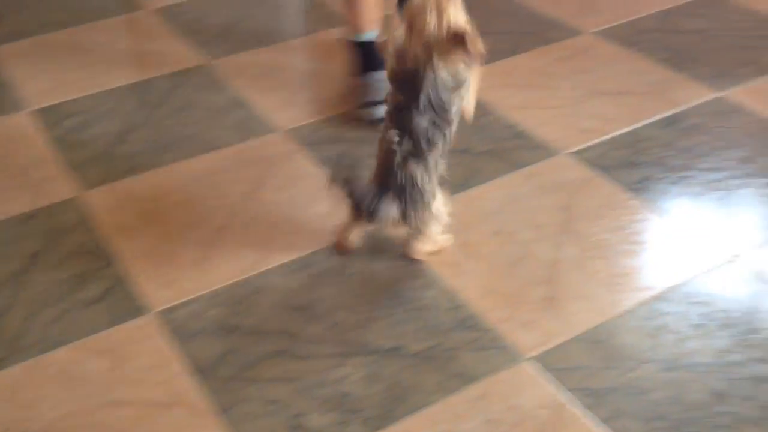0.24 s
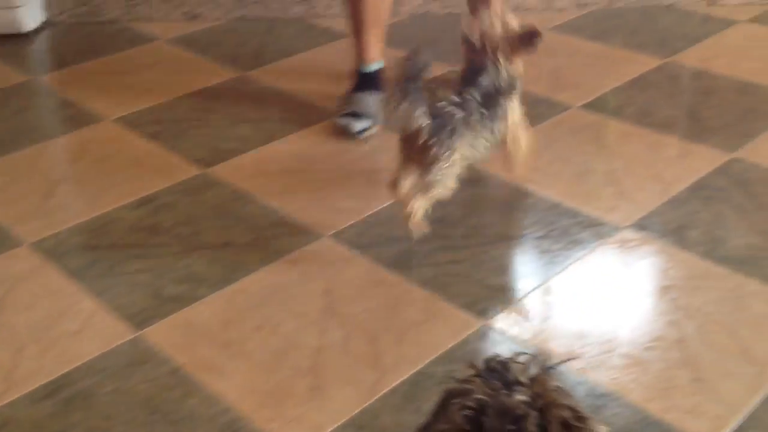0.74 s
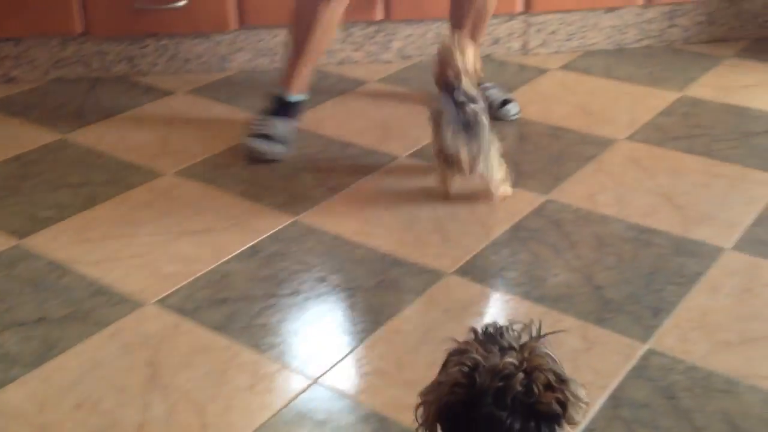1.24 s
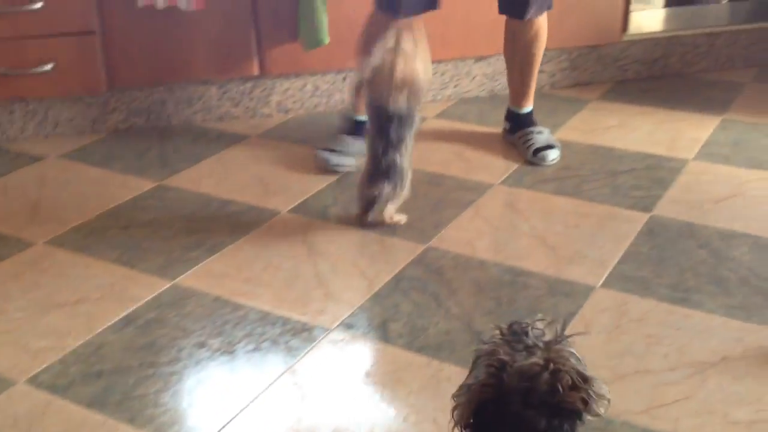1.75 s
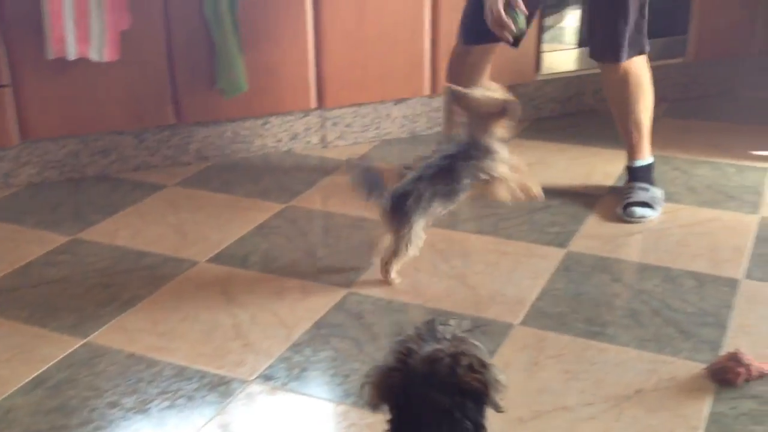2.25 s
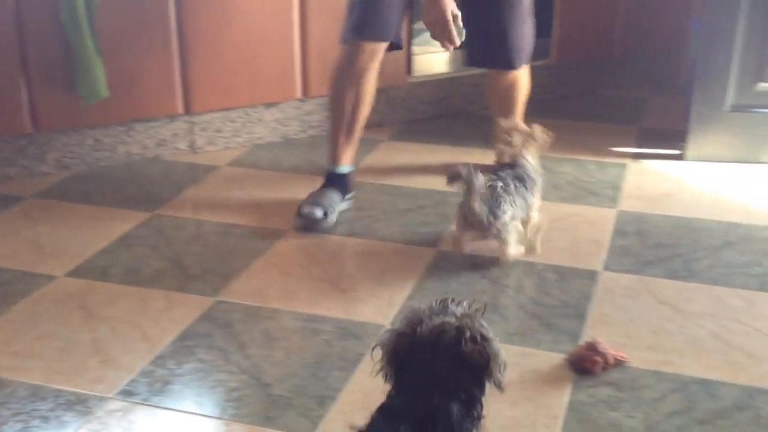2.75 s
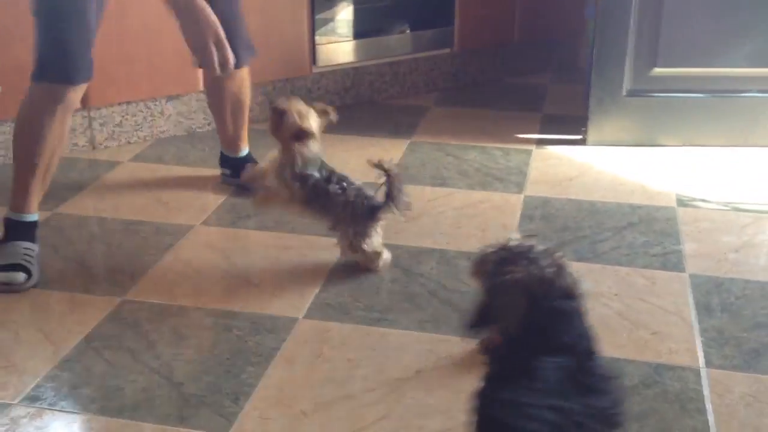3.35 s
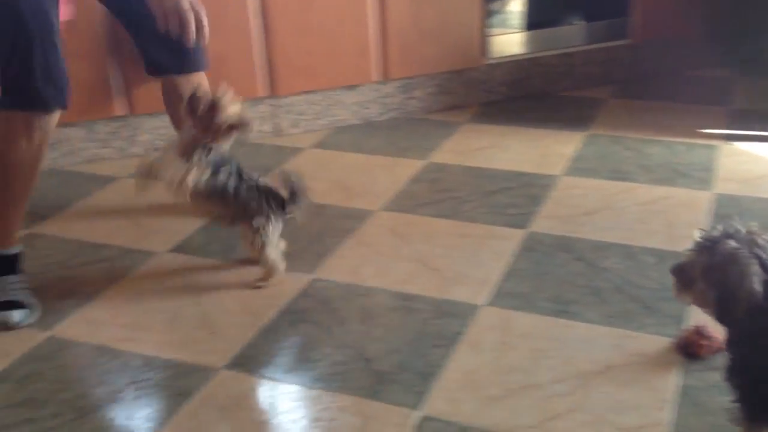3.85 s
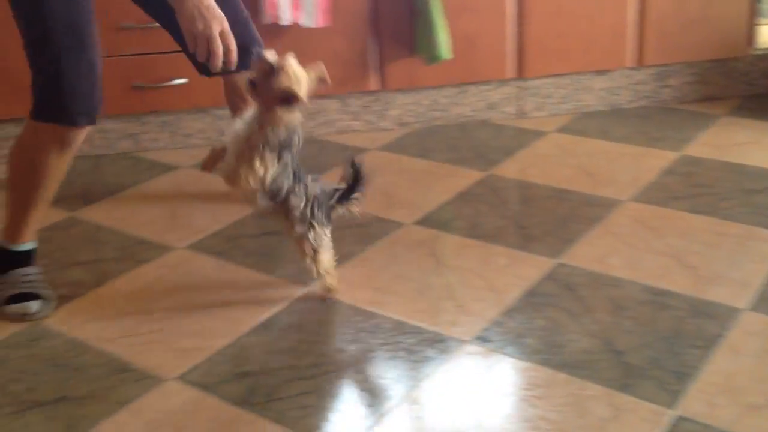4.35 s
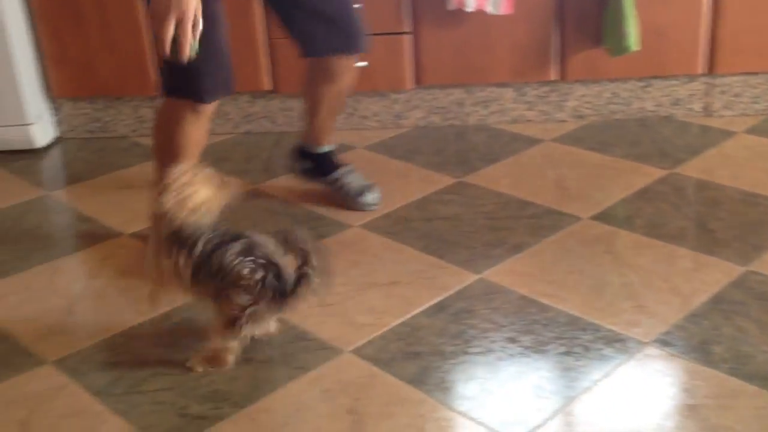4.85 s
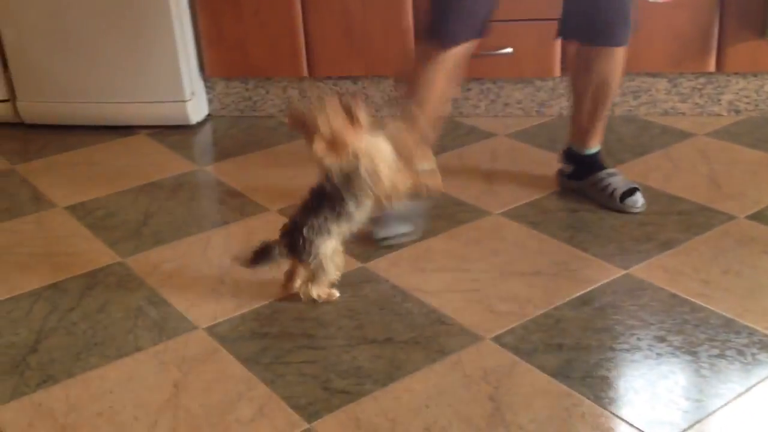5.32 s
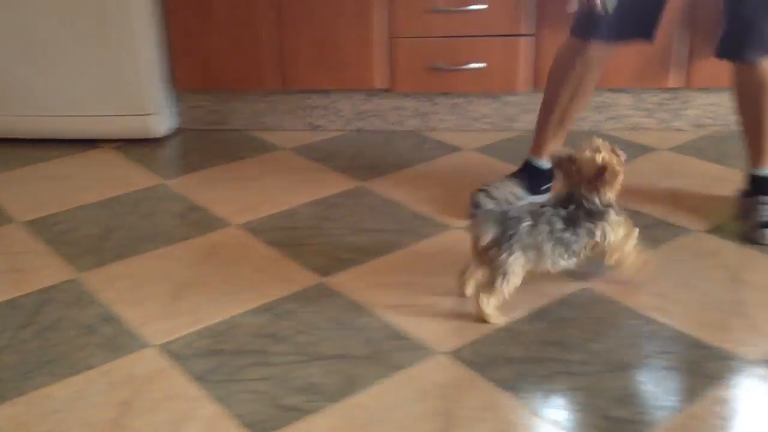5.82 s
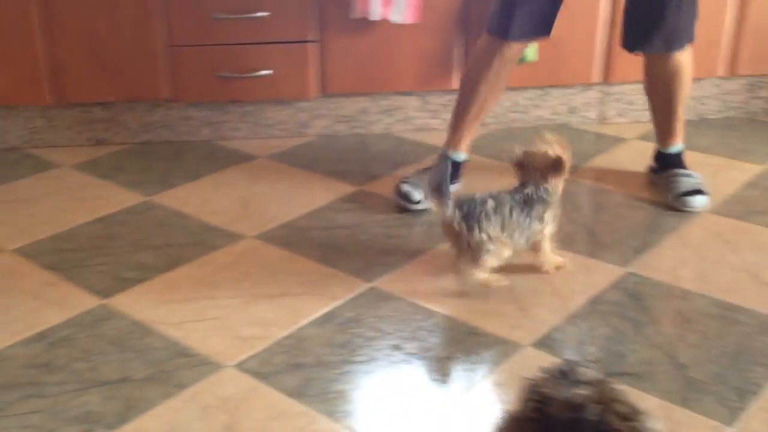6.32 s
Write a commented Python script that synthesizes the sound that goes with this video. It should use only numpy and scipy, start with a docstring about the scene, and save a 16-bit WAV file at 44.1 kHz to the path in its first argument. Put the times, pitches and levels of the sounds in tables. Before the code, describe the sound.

A small dog yaps three times in an echoing tiled kitchen, with faint panting and soft thumps of paws and feet between.

```python
"""A tiled kitchen, one mono microphone in the room with a small dog that jumps about and yaps three times.
Each yap is a rising voice shaped by throat and mouth, and the hard room rings after it. Between yaps
the dog pants, bodies shuffle, claws tick, paws and feet thump the floor and something squeaks faintly.
At this distance the room's ring on yaps and footfalls is about as strong as the direct sound."""
import sys
import numpy as np
from scipy import signal
from scipy.fft import rfft, irfft, next_fast_len
from scipy.io import wavfile
from scipy.ndimage import uniform_filter1d, minimum_filter1d, map_coordinates

SR = 44100
rng = np.random.default_rng(int(sys.argv[2]) if len(sys.argv) > 2 else 0)


def store_pcm(level_fs):
    """Save levels as 16-bit WAV."""
    pcm = np.round(np.clip(level_fs, -1, 1) * 32767).astype(np.int16)
    wavfile.write(sys.argv[1], SR, np.atleast_2d(pcm).T)


N = 290061


def amp(db):
    """Gain of a level in dB."""
    return 10 ** (np.asarray(db) / 20)


def unit(x):
    """x at rms 1."""
    return x / np.sqrt(np.mean(x ** 2) + 1e-20)


def along(points, hz):
    """(f/Hz, value) points read on a log frequency axis."""
    f, v = np.transpose(points)
    return np.interp(np.log(hz + 1), np.log(f + 1), v)


def curves(rows, t):
    """Each column after the time, read at times t."""
    times, *columns = np.transpose(rows)
    return [np.interp(t, times, column) for column in columns]


def wobble(rate, size=N):
    """A smooth random curve, rate knots a second."""
    knots = rng.standard_normal(int(size * rate / SR) + 4)
    return map_coordinates(knots, [np.arange(size) * rate / SR])


def filtered(x, response):
    """x times a response of frequency."""
    m = next_fast_len(len(x) + SR // 4)
    return irfft(rfft(x, m) * response(np.fft.rfftfreq(m, 1 / SR)), m)[:len(x)]


def coloured(x, spectrum):
    """x shaped by (f/Hz, level/dB) points, at rms 1."""
    return unit(filtered(x, lambda hz: amp(along(spectrum, hz))))


def rush(spectrum, patchy_db):
    """Coloured noise of rms 1 with patches of random gain in time and frequency."""
    z = signal.stft(rng.standard_normal(N + 512), nperseg=512)[2]
    patches = uniform_filter1d(uniform_filter1d(rng.standard_normal(z.shape), 6, 0), 8, 1)
    noise = signal.istft(z * amp(patchy_db * unit(patches)), nperseg=512)[1][:N]
    return coloured(noise, spectrum)


def add(track, start, x):
    """Mixes x into the track from start, in seconds."""
    part = track[round(start * SR):][:len(x)]
    part += x[:len(part)]


# Breaths: full from t/s, swell/s, hold/s, breath level/dB, hiss level/dB
BREATHS = [(0.0, .02, 0.089, -52.5, -57), (0.146, 0.077, 0.13, -51, -54.5),
           (0.313, 0.016, 0.048, -47.5, -57), (0.577, 0.11, 0.015, -51, -58.5),
           (0.674, 0.017, 0.026, -45, -58), (0.804, .06, 0.26, -47, -53.5), (1.472, 0.28, 0.19, -49.5, -58),
           (1.945, 0.19, 0.053, -50.5, -56), (2.39, 0.1, 0.12, -47.5, -52.5),
           (3.107, 0.11, 0.24, -47.5, -54.5), (3.58, 0.1, 0.12, -45, -51), (3.798, .04, 0.046, -51, -56.5),
           (4.021, 0.1, 0.13, -45.5, -52), (4.287, 0.066, 0.093, -56.5, -61),
           (4.419, 0.022, 0.025, -48, -61), (4.537, 0.079, 0.16, -51.5, -54), (4.792, .03, 0.14, -59, -61),
           (4.957, 0.036, 0.092, -59.5, -72), (5.375, 0.099, 0.072, -58, -60.5),
           (5.534, 0.076, 0.26, -52.5, -54.5), (5.947, 0.11, 0.12, -50.5, -56.5),
           (6.18, 0.023, 0.037, -53, -58), (6.416, 0.097, .17, -49, -53)]
# Body of a breath: f/Hz, level/dB
BREATH_SPECTRUM = [(290, -38), (500, -27), (568, 1), (645, -11.5), (786, -2.5), (969, -2.5), (1370, 0),
                   (1670, 2), (1900, 4.5), (3200, -6), (4750, -1), (8000, -19), (10400, -37.5),
                   (17600, -120)]
# Its treble edge: f/Hz, level/dB
HISS_SPECTRUM = [(3530, -35), (6000, 2), (6620, 0.5), (9820, -3), (13200, -2), (15300, -6)]


def panting():
    """The dog's breath, dry at the microphone: each swells, holds and fades, its hiss fading faster."""
    full_at, swell, hold, breath_db, hiss_db = np.transpose(BREATHS)[..., None]
    t = np.arange(0, N, 64) / SR
    swell_db = -18.5 * np.maximum(full_at - t, 0) / np.maximum(swell, .005)
    after_hold = np.maximum(t - full_at - hold, 0)

    def airflow(db, fade_db_per_s):
        each_breath = amp(db + swell_db - fade_db_per_s * after_hold)
        return np.interp(np.arange(N) / SR, t, np.linalg.norm(each_breath, axis=0))

    breath = airflow(breath_db, 84.5) * amp(1.1 * wobble(30)) * rush(BREATH_SPECTRUM, patchy_db=0.07)
    hiss = airflow(hiss_db, 102) * amp(.7 * wobble(40)) * rush(HISS_SPECTRUM, patchy_db=2.5)
    return breath + hiss


# Movement about the floor: t/s, level/dB
SHUFFLE_LEVELS = [(0.0, -50.5), (0.38, -64.5), (0.79, -54), (1.1, -58), (1.7, -61.5), (2.16, -56),
                  (2.49, -62), (2.75, -56), (3.0, -60.5), (3.52, -59.5), (5.51, -64.5), (5.7, -55.5),
                  (6.01, -58.5), (6.58, -56.5)]
# Its rumble: f/Hz, level/dB
SHUFFLE_SPECTRUM = [(24, -76.5), (40, -40), (144, -4.5), (168, -5.5), (214, 0.5), (333, -4), (598, -8),
                    (679, -6), (1200, -13), (1560, -34.5), (2640, -120)]


def shuffling():
    """Moving feet and bodies make a low, uneven rumble."""
    db = curves(SHUFFLE_LEVELS, np.arange(N) / SR)[0] + 1.7 * wobble(2.6)
    return amp(db) * rush(SHUFFLE_SPECTRUM, patchy_db=4.0)


# Room tone: f/Hz, level/dB
AIR_SPECTRUM = [(180, -27), (300, -9), (491, -24), (542, -12), (1170, -4.5), (1800, 2), (3050, -12.5),
                (4680, -2.5), (7170, -11), (12800, -15), (15300, -26)]


def room_tone():
    """The kitchen's air, a steady hush at the microphone."""
    return amp(-58.5) * rush(AIR_SPECTRUM, patchy_db=1.5)


# Ring of the hard room: f/Hz, t60/s
KITCHEN_DECAY = [(200, 0.54), (900, 0.73), (1500, 0.8), (3000, 0.8), (6000, 0.66), (12000, 0.37)]


def kitchen(x, wet_db, build_s):
    """Direct sound plus a tail that builds up from the walls and dies at its own speed per frequency."""
    hz, t, z = signal.stft(rng.standard_normal(2 * SR), SR, nperseg=256)
    decay = amp(-60 * t / along(KITCHEN_DECAY, hz)[:, None])
    tail = signal.istft(z * decay, SR, nperseg=256)[1]
    tail *= 1 - np.exp(-(np.arange(len(tail)) / SR / build_s) ** 2)
    wet = amp(wet_db) * signal.fftconvolve(x, tail / np.linalg.norm(tail))
    return wet + np.pad(x, (0, len(wet) - len(x)))


# Claws on tile: t/s, level/dB, f/Hz
CLAW_TICKS = [(0.121, -39, 12700), (0.1456, -26.5, 12350), (0.1558, -22, 8640), (0.589, -38, 7250),
              (2.321, -50, 12400), (2.8376, -49, 7890), (3.921, -43, 7840), (4.238, -40.5, 12560),
              (4.351, -36, 7060), (4.4184, -49, 7920), (4.9197, -47, 7840), (5.2764, -46, 8130),
              (5.3213, -47, 12400), (5.345, -33.5, 12400)]


def claws():
    """A claw striking tile gives a few noisy cycles high up."""
    out, t = np.zeros(N), np.arange(SR // 5) / SR
    t60_s = 0.0012
    for start, db, hz in CLAW_TICKS:
        tick = np.sin(2 * np.pi * hz * t) + .4 * rng.standard_normal(len(t))
        add(out, start, amp(db - 60 * t / t60_s) * tick)
    return out


# Paws and feet landing: t/s, level/dB, floor f/Hz, slap level/dB relative to the ring
LANDINGS = [(0.328, -55, 209, 12), (0.504, -44.5, 208, 1), (0.571, -42.5, 205, 6.5),
            (0.609, -54.5, 302, 14.5), (0.748, -33, 190, -11), (1.528, -44, 249.6, -5.5),
            (2.008, -48, 185, 7), (2.192, -51.5, 388, 7), (2.208, -44, 232, 4), (2.512, -33.5, 198, 1),
            (2.546, -33.5, 278, 4), (2.847, -49, 195.8, 10.5), (3.33, -45, 252, -3.5),
            (3.767, -31.5, 211, -10), (4.266, -41.5, 256, 1.5), (4.8, -40.5, 295, -3),
            (5.157, -45, 246, -7.5), (5.493, -48.5, 188, 3.5), (5.7, -53, 259, 7), (6.219, -40, 276, 2.5),
            (6.244, -36.5, 185, 0.5)]
# A sole or pad meeting tile: f/Hz, level/dB
SLAP_SPECTRUM = [(40, -25), (100, -7), (200, -4), (600, 0.5), (1500, -6.5), (2500, -18), (5000, -42)]


def footfalls():
    """Each landing is a low ring of the floor with a soft slap."""
    out, t = np.zeros(N), np.arange(SR // 5) / SR
    ring_t60_s, slap_t60_s = 0.084, 0.095
    slap_onset = 1 - np.exp(-t / .0015)
    for start, db, hz, slap_db in LANDINGS:
        rise_s = 0.003 * amp(-0.35 * slap_db)  # a soft landing sets the floor going more slowly
        ring = amp(-60 * t / ring_t60_s) * (1 - np.exp(-t / rise_s)) * np.sin(2 * np.pi * hz * t)
        noise = coloured(rng.standard_normal(len(t)), SLAP_SPECTRUM)
        slap = amp(slap_db - 60 * t / slap_t60_s) * slap_onset * noise
        add(out, start, amp(db - 3) * (ring + slap))
    return out


# Throat behind a barely open mouth, as each yap starts: f/Hz, level/dB
NARROW_MOUTH = [(300, -60), (900, -15), (1400, -14), (1950, 0), (2250, -2), (2850, -27), (3550, -21),
                (4100, -14), (4600, -9), (5200, -13), (6100, -40), (8800, -36), (12000, -52), (16000, -60)]
# Air rushing past the teeth once the mouth is open: f/Hz, level/dB
TEETH_RASP = [(4000, -43), (5800, 8), (6800, -7), (8200, -3), (10500, -4), (12700, -3.5), (14500, -16.5),
              (16000, -22.5)]


def yap(contour, throat, rasp_db, fundamental_db):
    """Overtones of a rising pitch, weighted by the throat; hoarseness turns them into pulsing noise."""
    t = np.arange(contour[0][0], contour[-1][0], 1 / SR)
    hz, db, rough = curves(contour, t)
    opening = np.clip((hz - 1040) / 200, 0, 1)  # the mouth opens as the pitch jumps up
    rough = np.clip(rough, 0, 1) * (.25 + .75 * opening)
    jitter = (0.004 + 0.1 * rough) * wobble(394.5, size=len(t))
    phase = 2 * np.pi * np.cumsum(hz * (1 + jitter)) / SR
    k = np.arange(1, 13)[:, None]
    treble_octaves = lambda f: np.log2(np.maximum(f / 2200, 1))
    soft_db = 0.81 * (db - db.max()) * treble_octaves(k * hz)  # a soft voice closes gently: less treble
    mouth_db = (1 - opening) * along(NARROW_MOUTH, k * hz) + opening * along(throat, k * hz)
    gains = amp(mouth_db + fundamental_db * (k == 1) + soft_db)
    tone = np.sqrt(2) * (gains * np.sin(k * phase)).sum(0) / np.linalg.norm(gains, axis=0)
    puffs = rng.standard_normal(len(t)) * (1 + 0.75 * np.cos(phase))  # one puff of breath a cycle
    hiss = unit(filtered(puffs, lambda f: amp(along(throat, f) + 3.1 * treble_octaves(f))))
    rasp = amp(rasp_db) * opening * coloured(puffs, TEETH_RASP)
    return amp(db) * (np.sqrt(1 - rough) * tone + np.sqrt(rough) * hiss + rasp)


# The voice, one list per yap: t/s, pitch f/Hz, level/dB, roughness/0-1
YAP_CONTOURS = [
    [(.900, 827, -62, 0.1), (.910, 913.5, -23, 0.1), (.922, 974.6, -15.5, 0.09), (.936, 1082, -11, 0.13),
     (.950, 1441, -12, 0.19), (.965, 1768, -11.5, 0), (.985, 1575, -42, 0.56), (1.012, 1467, -12, 0.69),
     (1.035, 1480, -50, .6)],
    [(2.471, 850, -67, .05), (2.478, 892.6, -25, 0), (2.488, 905.3, -15, 0), (2.502, 1058, -15.5, 0.39),
     (2.517, 1242, -12, 0.32), (2.533, 1432, -14.5, 0.4), (2.548, 1468, -16.5, 0), (2.57, 1350, -52, 0.2),
     (2.60, 1335, -59, 0)],
    [(5.664, 940, -62, 0.1), (5.673, 947.5, -28.5, 0.1), (5.686, 1027, -24.5, 0.08),
     (5.692, 1029, -16.5, 0.1), (5.700, 1048, -22.5, 0.1), (5.708, 1076, -23, 0.15),
     (5.720, 1297, -23, 0.22), (5.732, 1434, -21, 0), (5.768, 1504, -25, 0.07), (5.785, 1530, -74, 0.14)],
]
# Throat and open mouth from the microphone, as the head points at each yap: f/Hz, level/dB
OPEN_MOUTHS = [
    [(300, -69.5), (800, -20.5), (1100, -12.5), (1500, 4), (2350, -4), (2900, -15.5), (3700, -4.5),
     (4700, -4), (5400, -9), (6300, -23.5), (8000, -20.5), (12000, -44), (16000, -41.5)],
    [(300, -62.5), (800, -5.5), (1100, 0.5), (1450, 10), (2200, 2), (2900, -11.5), (3500, -0.5),
     (4500, -10), (5300, -11), (6500, -31), (8500, -27.5), (12000, -46), (16000, -44)],
    [(300, -60), (800, -27), (1100, -11), (1480, -2), (2070, -1), (2900, -8), (3600, -5), (4450, 0),
     (5300, -12.5), (6300, -34), (9500, -37), (12000, -42), (16000, -59.5)],
]
# Balance of each yap: rasp level/dB and room level/dB relative to the voice, fundamental boost/dB
YAP_BALANCE = [(-20.5, 4, -1), (-20, -0.5, 1), (-32, -1, 6)]


def yapping():
    """Each yap reaches the microphone from another spot, so the room answers anew."""
    out = np.zeros(N)
    for contour, throat, (rasp_db, wet_db, fundamental_db) in zip(YAP_CONTOURS, OPEN_MOUTHS, YAP_BALANCE):
        voice = yap(contour, throat, rasp_db, fundamental_db)
        add(out, contour[0][0], kitchen(voice, wet_db, build_s=.012))
    return out


# Faint squeaks: t/s, length/s, start f/Hz, end f/Hz, level/dB
SQUEAK_GLIDES = [(3.27, 0.048, 1750, 2160, -47), (4.28, 0.045, 1930, 1950, -48),
                 (4.398, 0.075, 2080, 1700, -42.5)]


def squeaks():
    """Thin, unsteady gliding tones, likely the dog whimpering."""
    out, t = np.zeros(N), np.arange(SR // 5) / SR
    for start, length, start_hz, end_hz, db in SQUEAK_GLIDES:
        progress = np.clip(t / length, 0, 1)
        hz = (start_hz + (end_hz - start_hz) * progress) * (1 + 0.029 * wobble(163, size=len(t)))
        phase = 2 * np.pi * np.cumsum(hz) / SR
        tone = np.sin(phase) + amp(-18) * np.sin(2 * phase)
        add(out, start, amp(db) * np.sin(np.pi * progress) * tone)
    return out


def scene():
    """Everything reaches one microphone; ticks, thumps and squeaks share one ring of the room."""
    mix = yapping() + panting() + shuffling() + room_tone()
    small_sounds = kitchen(footfalls() + claws() + squeaks(), wet_db=2.0, build_s=0.0027)
    return (mix + small_sounds[:N])[None]


def record(dry):
    """The recorder drops deep bass, limits the loudest peaks and keeps nothing above its band limit."""
    low_cut_hz, ceiling, top_hz = 110, .96, 15400
    x = filtered(dry[0], lambda hz: (hz / low_cut_hz) ** 3 / (1 + (hz / low_cut_hz) ** 3) + .004)
    safe_gain = np.minimum(1, ceiling / (np.abs(x) + 1e-9))
    x *= uniform_filter1d(minimum_filter1d(safe_gain, size=181), size=180)
    return filtered(x, lambda hz: hz < top_hz)[None]


dry = scene()
out = record(dry)
store_pcm(out)
```